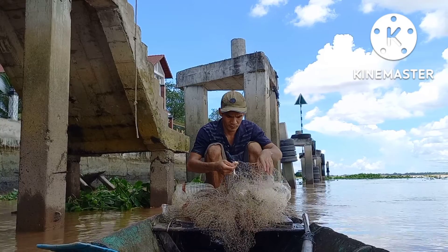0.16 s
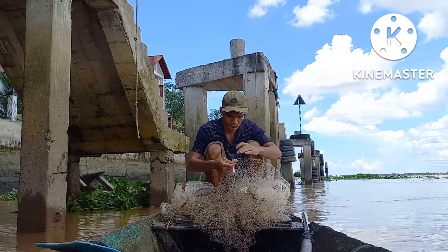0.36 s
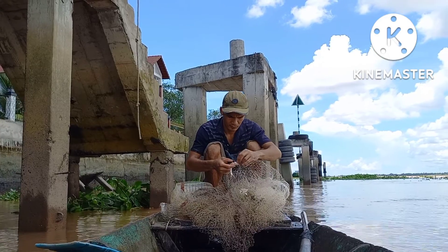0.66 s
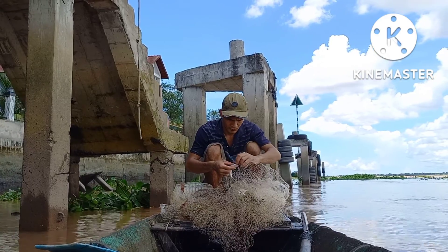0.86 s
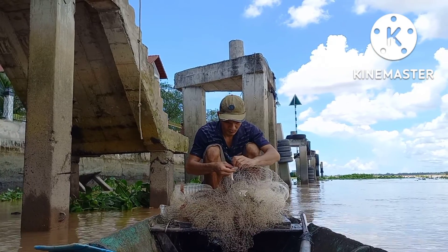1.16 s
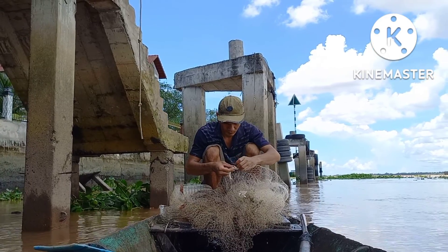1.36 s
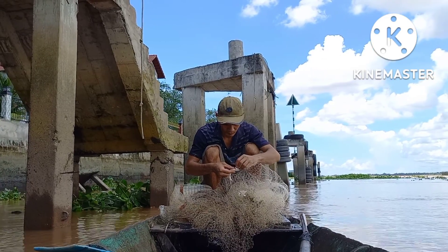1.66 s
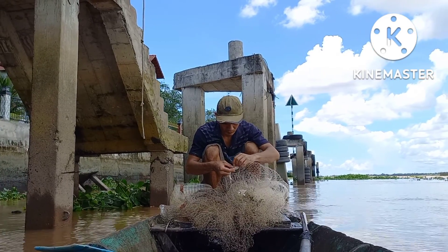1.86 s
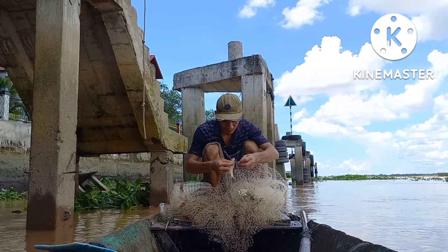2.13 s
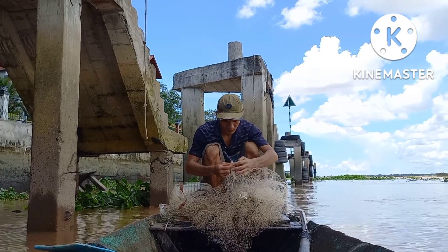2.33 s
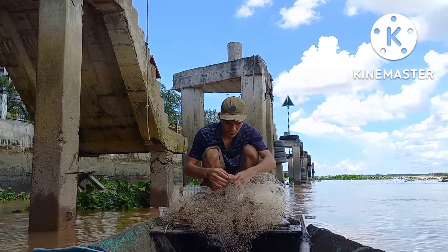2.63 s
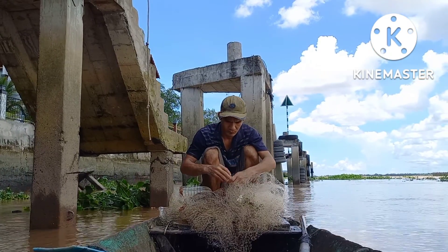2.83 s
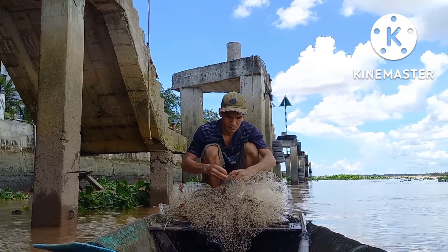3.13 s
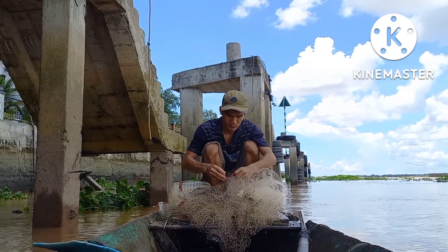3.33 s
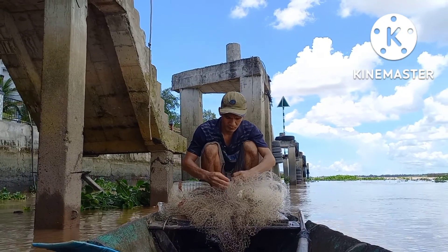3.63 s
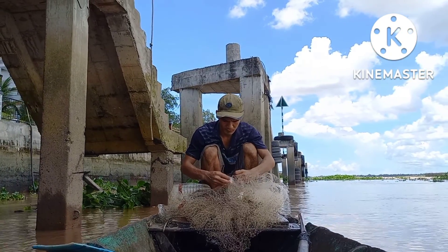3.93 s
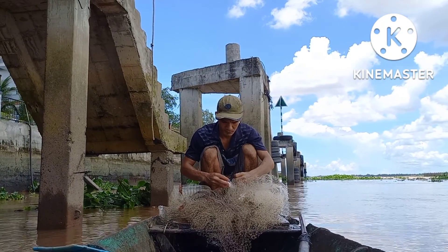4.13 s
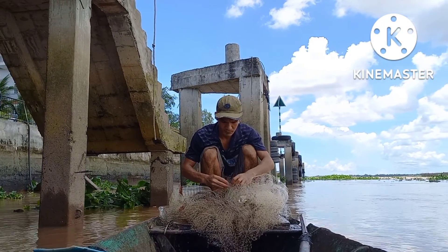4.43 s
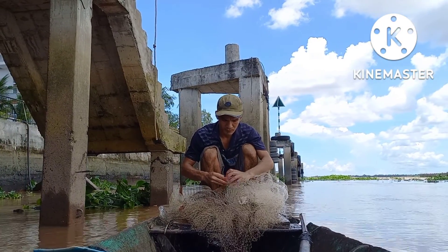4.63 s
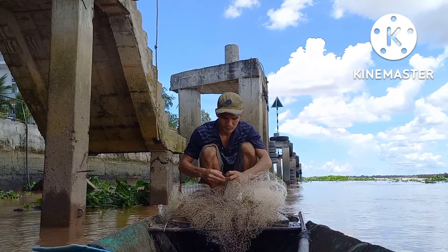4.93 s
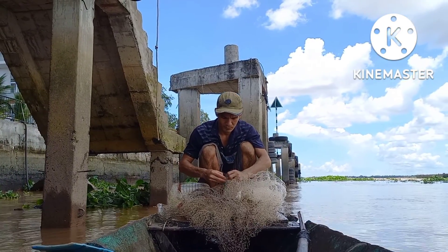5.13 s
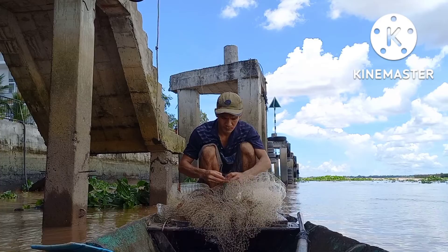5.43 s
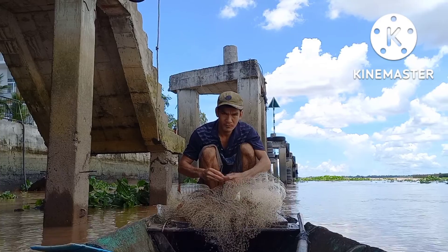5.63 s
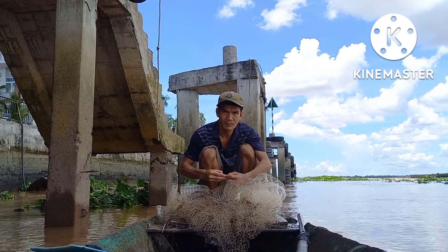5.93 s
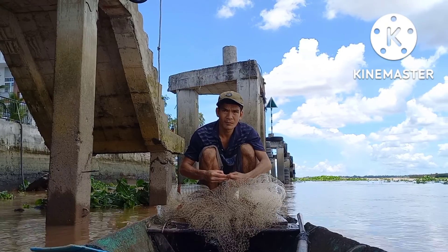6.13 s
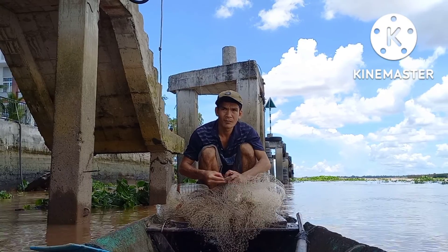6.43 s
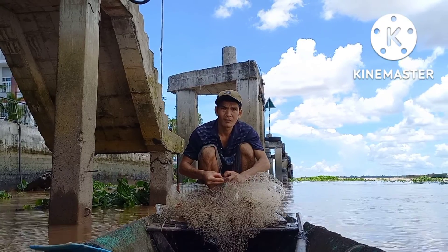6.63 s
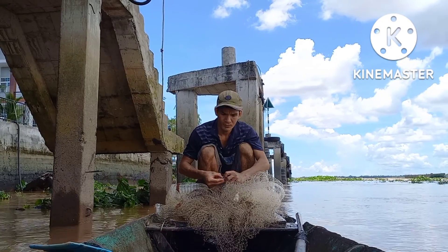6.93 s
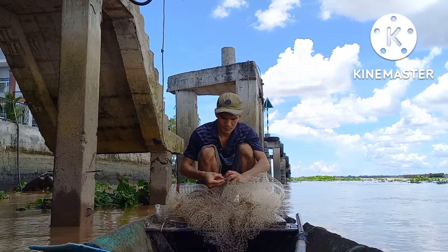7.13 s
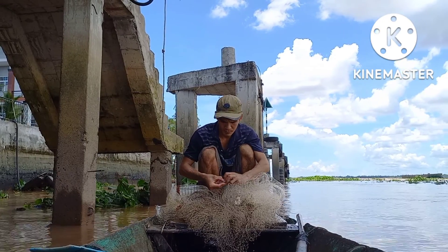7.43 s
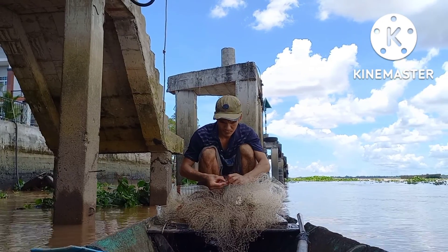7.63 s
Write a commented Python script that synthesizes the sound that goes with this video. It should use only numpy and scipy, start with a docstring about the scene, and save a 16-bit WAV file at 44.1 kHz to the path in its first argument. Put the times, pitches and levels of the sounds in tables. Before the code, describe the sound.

Outdoors on a river, heard close up in stereo from a small boat by a concrete pier. For the first 0.4 seconds thin metal rings jingle very high and bright, with a round water plop at the start. Drips follow at 0.45, 0.6 and 1.07 seconds. From 1.25 to 2.5 wet strands snap and spray amid plops and crackly rustle. Tiny ring pings come around 2.7 to 2.85, then a strong short plop at 2.98. Snaps are densest and sharpest from 3.4 to 4.15, with bright clinks near 3.65 and 4.15. Plops and spatters continue to 5, lighter ticks to 6.25, a drip at 6.5, then sparse drops at 7.15 and 7.7 with a last faint rustle. Throughout, a distant ship's low, wavering twin-diesel drone and rumble sits under soft lapping and hiss; from about 5.5 a small boat's rapid hollow chugging faintly grows.

```python
"""Wet net beside a pier

Heard from the bow of a small boat: a wet net is picked over close to the two microphone ports.
Drops plop as ringing bubbles, strands snap as noise bursts and metal rings jingle as struck modes.
Behind lie lapping and hiss of shaped noise, a distant ship whose two diesels are stacks of sines,
and a single-cylinder boat chugging nearer, its puffs ringing an exhaust pipe."""
import sys
import numpy as np
from scipy import signal
from scipy.io import wavfile
from scipy.ndimage import uniform_filter1d

SR = 44100
rng = np.random.default_rng(int(sys.argv[2]) if len(sys.argv) > 2 else 0)


def int16_out(signal):
    """Quantize to a 16-bit WAV file."""
    q = np.round(np.clip(np.atleast_2d(signal).T, -1, 1) * 32767)
    wavfile.write(sys.argv[1], SR, q.astype(np.int16))


N = 342657  # samples


def gain_of(db):
    """dB to gain."""
    return 10 ** (np.asarray(db) / 20)


def evened(x):
    """Scales to rms 1."""
    return x / np.sqrt(np.mean(x ** 2) + 1e-20)


def read(points, hz):
    """Reads a spectrum table on a log-frequency axis."""
    f, value = np.transpose(points)
    return np.interp(np.log(hz + 1), np.log(f + 1), value)


def curve(rows, t, column=1):
    """Reads one column of a curve at times t."""
    rows = np.asarray(rows)
    return np.interp(t, rows[:, 0], rows[:, column])


def add(mix, s, sound, pan_db, lag=4.4):
    """Places a sound: the louder port leads by lag samples per dB, or trails if lag is negative."""
    late = int(np.clip(lag * pan_db, -22, 22))
    for channel, sign in enumerate((1, -1)):
        start = round(s * SR) + max(-sign * late, 0)
        part = mix[channel, start:][:len(sound)]
        part += gain_of(sign * pan_db / 2) * sound[:len(part)]


def resonate(x, hz, width):
    """One resonance of gain 1 at its centre; width in Hz."""
    r = np.exp(-np.pi * width / SR)
    return 2 * signal.lfilter([1 - r], [1, -r * np.exp(2j * np.pi * hz / SR)], x).real


def drift(t, top_hz, count=20):
    """Slow chance of rms 1: sines of random phase, the slower ones stronger."""
    hz = np.geomspace(top_hz / 20, top_hz, count)[:, None]
    sines = np.sin(2 * np.pi * (hz * t + rng.random((count, 1))))
    return evened((sines / np.sqrt(hz)).sum(0))


# likeness of the two ports: (frequency [Hz], left-right correlation)
PORT_LIKENESS = [(30, .7), (60, 0.89), (130, 1), (290, 0.9), (640, 0.31), (1410, .2), (3100, 0.074),
                 (6820, -0.078), (15000, -0.087)]
# lean of the background noise: (frequency [Hz], left minus right [dB])
SIDE_LEAN = [(60, 1), (180, -1.5), (550, 3.5), (1650, 0.5), (4970, 1.0), (15000, 0.5)]


def noise(shape_db, size, patchy_db, same=None, lead=0):
    """Two-port noise of rms 1: shape_db(hz, t) shapes its bins, left leads by lead samples."""
    hop = size // 4
    frames = N // hop + 5
    hz = np.fft.rfftfreq(size, 1 / SR)[:, None]
    a, b, c, d, patches = rng.standard_normal((frames, len(hz), 5)).T
    patches = uniform_filter1d(patches, size=8, axis=0)
    patches = evened(uniform_filter1d(patches, size=10, axis=1))
    same = np.clip(read(PORT_LIKENESS, hz) if same is None else same, -1, 1)
    left = a + 1j * b
    delayed = left * np.exp(-2j * np.pi * hz * lead / SR)
    right = same * delayed + np.sqrt(1 - same ** 2) * (c + 1j * d)
    lean_db = read(SIDE_LEAN, hz) / 2
    level_db = shape_db(hz, np.arange(frames) * hop / SR) + patchy_db * patches
    bins = np.array([left, right]) * gain_of(level_db + np.array([lean_db, -lean_db]))
    return evened(signal.istft(bins, nperseg=size, noverlap=size - hop)[1][:, :N])


PORT_HZ, STARBOARD_HZ = 8.467, 8.19  # working cycles of the two diesels
WEAK_ORDERS_DB = -74
WAVER_DB, WAVER_TURNS, WAVER_TOP_HZ = 2.4, .1, 12  # rms waver of level and phase, and its fastest rate
# sounding orders of each diesel: (multiple of the cycle, level before swell and waver [dB rms])
PORT_ORDERS = [(6, -59.5), (12, -46), (14, -54), (15, -73), (17, -61.5), (18, -48.5), (19, -63.5),
               (20, -62), (21, -59.5), (22, -62), (24, -49), (27, -72), (28, -74.5), (30, -51), (33, -69.5),
               (34, -53.5), (35, -55), (36, -57.5), (37, -64.5), (48, -62), (51, -76), (59, -64), (63, -76)]
STARBOARD_ORDERS = [(7, -65.5), (8, -50.5), (10, -55.5), (12, -48), (14, -50), (16, -51), (17, -68),
                    (18, -49.5), (19, -50.5)]
# low tones apart from both engines' orders: (frequency [Hz], level before waver [dB rms])
OTHER_TONES = [(79.2, -52.5), (80.5, -48), (87.4, -47.5), (121, -57.5)]
# swell of the port diesel: (time [s], 12th order [dB], orders above it [dB])
PORT_SWELL = [(0, 0.5, 1), (2, -8, -1), (4.6, 0.5, -1.5), (5.2, 6, -2), (6.8, 5, -3), (7.3, 0.5, -7),
              (7.77, 8, -5)]


def ship():
    """Each diesel sounds multiples of its cycle; the air over the river makes every line waver."""
    t, slow = np.arange(N) / SR, np.arange(0, N / SR + .1, .02)
    out = np.zeros((2, N))
    weak = [(k, WEAK_ORDERS_DB) for k in range(38, 66) if k not in dict(PORT_ORDERS)]
    engines = ((PORT_HZ, list(PORT_ORDERS) + weak), (STARBOARD_HZ, STARBOARD_ORDERS), (1, OTHER_TONES))
    for hz, orders in engines:
        turns = hz * t + np.interp(t, slow, 0.0034 * drift(slow, 0.593))
        for k, db in orders:
            swells = k >= 12 and hz == PORT_HZ
            swell_db = curve(PORT_SWELL, slow, column=1 if k == 12 else 2) * swells
            level_db = db + swell_db + WAVER_DB * drift(slow, WAVER_TOP_HZ, count=12)
            level = np.interp(t, slow, np.sqrt(2) * gain_of(level_db))
            waver = np.interp(t, slow, WAVER_TURNS * drift(slow, WAVER_TOP_HZ, count=12))
            phase = 2 * np.pi * (k * turns + rng.random() + waver)
            # reflections off the pier differ between the ports
            skew = np.interp(t, slow, (.11 + .001 * k * hz) * drift(slow, 2.5, count=6))
            out += level * np.sin([phase + skew, phase - skew])
    return out


# colour of the exhaust roar: (frequency [Hz], relative level [dB])
ROAR_COLOUR = [(15, -56.5), (25, -38), (70, 1.5), (113, -1), (157, -0.5), (231, -10), (282, -6),
               (309, -13.5), (350, -16.5), (499, -17), (601, -23.5), (746, -23.5), (1000, -53.5),
               (1300, -79), (2200, -120)]
# course of the roar: (time [s], level [dB], lift from 200 Hz up, full from 400 Hz [dB])
ROAR_LEVEL = [(0, -41.5, 2), (2, -40.5, -0.5), (4, -43.5, 3.5), (5, -46, 5.5), (6, -40.5, -3),
              (7.77, -43, 1.5)]


def rumble():
    """Unsteady exhaust roar between the ship's lines: patchy low noise."""
    def shape(hz, t):
        upper = np.clip(np.log2((hz + 1) / 200), 0, 1)
        return read(ROAR_COLOUR, hz) + upper * curve(ROAR_LEVEL, t, column=2)
    return gain_of(curve(ROAR_LEVEL, np.arange(N) / SR)) * noise(shape, size=4096, patchy_db=2.5)


CHUG_PER_S, CHUG_AT_S = 12.64, 6.777  # firing rate, time of one firing
# boat drawing nearer: (time [s], level [dB])
CHUG_LEVEL = [(0, -74), (2, -74), (4, -72), (5.5, -67), (6.5, -60), (7.77, -59.5)]


def chug():
    """One exhaust puff a firing rings the pipe: a thump, then turbulence."""
    t = np.arange(N) / SR
    turns = (t - CHUG_AT_S) * CHUG_PER_S
    firing = np.floor(turns)
    strength = gain_of(2.0 * rng.standard_normal(120))[firing.astype(int) % 120]
    thump = 13 * (np.diff(firing, prepend=0) == 1)
    turbulence = np.exp(-(turns % 1) / .24) * rng.standard_normal((2, N))
    puffs = strength * (thump + turbulence)
    pipe = np.array([resonate(resonate(resonate(puff, 723, 82), 743, 200), 743, 200) for puff in puffs])
    lean_db = [[1.5], [-1.5]]  # a little to the left
    return gain_of(curve(CHUG_LEVEL, t) + lean_db) * evened(pipe)


HISS_DB, HISS_WAVER_DB = -74.5, .6
FAR_BUBBLES_DB = -26  # under the lapping
LEAD = 21  # samples between the two ports for sound from the side
# colour of the water, before the lapping and hiss are parted: (frequency [Hz], relative level [dB])
WATER_COLOUR = [(470, -17.5), (800, -0.5), (940, -9.5), (1150, -12), (1880, -22.5), (2600, -26.5),
                (4170, -31.5), (5830, -38), (6360, -35.5), (8570, -36), (14800, -37.5), (15600, -35)]
# course of the lapping: (time [s], level [dB])
LAPPING_LEVEL = [(0, -56.5), (0.6, -59.5), (0.8, -61.5), (1.14, -58), (1.44, -57.5), (1.83, -63),
                 (2.2, -57), (2.4, -60.5), (2.9, -59.5), (3.3, -63), (3.75, -61.5), (4.1, -61), (5.2, -60),
                 (5.41, -60), (5.75, -62), (6.08, -58), (6.32, -61.5), (7.24, -62), (7.74, -58)]


def river():
    """Lapping is low patchy noise with many tiny far bubbles; a steady hiss lies above it."""
    def lapping(hz, t):
        return read(WATER_COLOUR, hz) - 9 * np.log2(1 + (hz / 3000) ** 2) + 0 * t

    def hiss(hz, t):
        low_cut_db = 12 * np.log2(1 + (2800 / (hz + 1)) ** 2)
        return read(WATER_COLOUR, hz) - low_cut_db + HISS_WAVER_DB * drift(t, 28)

    low = noise(lapping, size=512, patchy_db=3.0, same=0.49, lead=LEAD)
    high = noise(hiss, size=512, patchy_db=1.2)
    far = np.zeros((2, N))
    for s, size, pitch, side in rng.random((500, 4)):
        bubble = plop(9 * size - 7 * pitch, 1000 * 2 ** (1.2 * pitch), 0.048, 0.033)
        add(far, s * N / SR, bubble, 10 * side - 3)
    lapped = low + gain_of(FAR_BUBBLES_DB) * evened(far)
    return gain_of(curve(LAPPING_LEVEL, np.arange(N) / SR)) * lapped + gain_of(HISS_DB) * high


PIER_DB = -14  # echoes under the near sound


def pier(x):
    """Short echoes off the hull and the concrete: sparse taps of random sign, dying fast."""
    at = np.arange(200, 6000, 20) + rng.integers(0, 20, (2, 290))  # samples
    echoes = rng.choice([-1., 1.], at.shape) * gain_of(-60 * at / SR / 0.17)  # t60 0.17 s
    taps = np.zeros((2, 6100))
    np.put_along_axis(taps, at, echoes, 1)
    return signal.oaconvolve(x, taps / np.linalg.norm(taps[0]), axes=1)[:, :N]


TUG_RISE_DB_PER_S = 607
# tugs at the mesh: (time [s], fade t60 [s], crackle level [dB], patter level [dB])
MESH_TUGS = [(1.264, 0.33, -77, -79), (1.56, 0.98, -78, -85), (1.69, 0.64, -78, -66),
             (1.804, 0.27, -65, -68), (2.321, 0.38, -84, -72), (2.929, .4, -81, -78),
             (3.08, 0.81, -79, -73.5), (3.401, 1, -73.5, -72.5), (3.592, 0.85, -66, -73),
             (3.769, 0.48, -69, -73), (3.943, .8, -73, -92), (4.087, 0.13, -73, -73),
             (4.147, 0.27, -73, -76), (4.587, 0.61, -79, -69), (4.893, 0.17, -80, -76),
             (4.951, 0.24, -89, -68), (5.27, 0.54, -69, -69.5), (5.48, 0.99, -78, -71.5),
             (6.083, .4, -85, -78), (6.197, 0.16, -74, -83), (6.252, .2, -84, -103),
             (7.722, 0.41, -72, -87)]


def rustle():
    """Knots slip in a dense crackle and droplets patter loose; each tug swells fast and fades."""
    out = np.zeros((2, N))
    t = np.arange(-.05, .3, 1 / SR)  # the tug peaks at 0
    for s, t60, crackle_db, patter_db in MESH_TUGS:
        chance = rng.random((3, 2, len(t)))
        size = gain_of(np.minimum(-4.2 * np.log(1 - chance[1]), 15))
        grains = (chance[0] < 2200 / SR) * size * np.sign(chance[2] - .5)
        crackle = evened(np.array([resonate(resonate(g, 11000, 9000), 11000, 12000) for g in grains]))
        # the patter takes its grains from the opposite port
        patter = evened(np.array([resonate(resonate(g, 1400, 1300), 1800, 1800) for g in grains[::-1]]))
        shape = gain_of(np.minimum(TUG_RISE_DB_PER_S * t, -60 * t / t60))
        shape = shape * signal.windows.tukey(len(t), .15)
        tug = shape * (gain_of(crackle_db) * crackle + gain_of(patter_db) * patter)
        part = out[:, round((s + t[0]) * SR):][:, :len(t)]
        part += tug[:, :part.shape[1]]
    return out


def splash(db, hz, t60):
    """About 1100 droplets a second, each a click ringing for a few cycles around one pitch."""
    t = np.arange(0, .25, 1 / SR)
    chance = rng.random((3, len(t)))
    size = gain_of(np.minimum(-4 * np.log(1 - chance[1]), 13))
    drops = (chance[0] < 1100 / SR) * size * np.sign(chance[2] - .5)
    width = .33 * hz
    spatter = evened(resonate(resonate(drops, hz, width), hz, width))
    return gain_of(db - 60 * t / t60) * np.minimum(t / 0.0069, 1) * spatter


# spatters of many small drops: (time [s], level [dB], centre [Hz], t60 [s], left minus right [dB])
SPATTERS = [(0.468, -68, 3800, .1, 0), (1.257, -64.5, 3300, 0.18, 1), (1.622, -72, 4300, 0.3, 3.5),
            (1.676, -76, 3520, 0.066, -1), (0.701, -65, 1940, 0.088, 5), (1.792, -61.5, 2590, 0.35, 4),
            (2.317, -59.5, 1900, .2, 4), (6.52, -64, 1300, .12, 1), (.712, -65, 1650, 0.073, -1),
            (3.048, -62, 1790, .1, 1), (4.581, -67, 1880, .25, 4), (.975, -65, 1610, 0.44, 2),
            (2.984, -65, 1500, .2, 2), (4.806, -71, 4730, 0.34, 2), (4.945, -78, 1850, .12, 5),
            (5.225, -79, 4050, 0.73, 11), (6.058, -62, 1500, 0.2, 1.5), (6.107, -69, 5200, .05, 0),
            (6.121, -71, 4100, 0.13, 4.5), (6.195, -70, 3200, 0.17, -0.5), (6.2, -70, 4400, .06, -1)]


def splashes(out):
    """Many small drops hit the water at once."""
    for s, db, hz, t60, pan_db in SPATTERS:
        add(out, s, splash(db, hz, t60), pan_db)


def rings(taps, hz, spread):
    """Taps through the modes of a metal ring; spread scales the mode widths."""
    total = 0
    for multiple, db, width in RING_MODES:
        mode = resonate(taps, hz * multiple, width * spread)
        total = total + gain_of(db) * resonate(mode, hz * multiple, width * spread)
    return total


# modes of one ring: (multiple of its pitch, level [dB], width before spread [Hz])
RING_MODES = [(1, 0, 300), (1.028, -6, 250), (1.11, -17, 500), (.555, -17, 260), (.46, -18, 300),
              (.185, -21, 300)]
RING_HZ = 13400
# rings shaken together: (time [s], level [dB])
JINGLE_LEVEL = [(0.0, -58), (0.034, -65), (0.044, -62.5), (0.186, -57), (0.216, -60), (0.272, -57.5),
                (0.294, -66), (0.3, -60.5), (0.34, -66.5), (0.4, -90)]


def jingle(out):
    """Four rings of a bunch, each tapped at random and rattling unevenly, open the scene."""
    t = np.arange(0, JINGLE_LEVEL[-1][0], 1 / SR)
    for pan_db, size in ((-10, .972), (10, .99), (-10, 1.012), (10, 1.035)):
        hits = rng.random(len(t)) < 3000 / SR
        taps = hits * gain_of(1.8 * rng.exponential(1, len(t))) * rng.choice([-1, 1], len(t))
        taps *= gain_of(5 * drift(t, 150))
        chime = rings(taps, RING_HZ * size, spread=1.4)
        clatter = resonate(resonate(rng.permutation(taps), 13000, 7900), 12500, 7700)
        shaken = evened(chime) + gain_of(-10.0) * evened(clatter)
        add(out, 0, gain_of(curve(JINGLE_LEVEL, t)) * shaken / np.sqrt(2), pan_db)


PING_S = 0.041  # time to fall 60 dB
# small metal rings touching: (time [s], level [dB], ring pitch [Hz], left minus right [dB])
RING_PINGS = [(2.699, -62, 13850, 11), (2.7204, -65, 13400, -2), (2.7556, -68, 13100, -15),
              (2.8035, -71, 14000, -3), (2.8285, -73, 13800, 0), (2.8434, -70, 14200, 3),
              (3.6237, -59, 13700, -1), (3.6512, -53, 13540, -4.5), (4.1255, -58, 13160, -1),
              (4.153, -62, 13060, -3), (4.2088, -63, 13900, 0), (5.7857, -66, 14000, 7.5),
              (6.5021, -68, 13300, -7)]


def pings(out):
    """Rings touch: noise through the ring modes, dying fast."""
    t = np.arange(0, .15, 1 / SR)
    for s, db, hz, pan_db in RING_PINGS:
        chatter = evened(rings(rng.standard_normal(len(t)), hz, spread=.6))
        add(out, s, gain_of(db - 60 * (t / PING_S) ** 1.6) * chatter, pan_db)


SPRAY_T60_S = 0.12


def snap(db, tilt_db, centre_hz):
    """A sharp bright tick, then a grainy spray of fine droplets."""
    t = np.arange(0, .16, 1 / SR)
    clumps_db = 10 * uniform_filter1d(rng.standard_normal(len(t)), size=40)
    grains = rng.standard_normal(len(t)) * gain_of(clumps_db)
    tick = grains * gain_of(-60 * t / 0.01)
    spray = grains * gain_of(-8.5 - 60 * t / SPRAY_T60_S)
    low = resonate(.3 * tick + spray, centre_hz, .45 * centre_hz)
    low = resonate(low, centre_hz, .6 * centre_hz)
    high = resonate(.9 * tick + spray, 11400, 6000)
    high = 1.15 * resonate(resonate(high, 12000, 6500), 12000, 6500)
    share = np.clip(gain_of(tilt_db), .05, .98)
    return gain_of(db) * (np.sqrt(1 - share ** 2) * low + share * high)


# strands flicking and spraying: (time [s], level [dB], share of high treble before limits [dB],
# centre of the low treble [Hz], left minus right [dB])
STRAND_SNAPS = [(0.471, -59, -12, 4800, 5), (0.5255, -65, 0, 6500, 3), (1.258, -64, -15, 4500, 3),
                (1.5604, -59, -15, 7800, 8), (1.5674, -57, -19, 7000, 5), (1.622, -54, -16, 6300, 3.5),
                (1.677, -56, -19, 4200, 5), (1.768, -63, 0, 6900, 3), (1.7944, -50, 7, 8140, 4),
                (1.8394, -61, -11, 8040, -1), (2.0956, -64, -11, 7800, 0), (2.3196, -58, -22, 6500, 6.5),
                (2.4516, -59.5, -22, 5200, 9), (2.93, -61, -13, 7700, 4), (2.947, -59, -22, 8000, -1),
                (3.4024, -52.5, -19, 6800, 3), (3.4344, -61, -15, 6900, 2), (3.4554, -59, -14, 7500, 3),
                (3.5927, -50, 2, 7900, 3), (3.625, -50, 0, 6200, 0.5), (3.7585, -58, -8, 8000, 5),
                (3.7894, -67, 1, 6500, 4), (3.904, -57.5, -6, 7700, 3.5), (3.925, -54, -4, 7200, 2.5),
                (3.947, -48, -6.5, 7550, 4.5), (3.993, -55.5, 1, 8200, 8), (4.077, -59.5, -11, 6800, 5),
                (4.148, -52.5, -6, 8000, 4), (4.579, -61, -16, 5900, 5), (4.6094, -59, -20, 6200, 5),
                (4.807, -53.5, -14, 6430, 5), (5.224, -63, -7, 6100, 5), (5.25, -65, 1, 6500, 9),
                (5.2894, -63, -11, 6500, -8), (5.3258, -62, -2, 6500, 3.5), (5.4794, -61, -19, 6500, 7),
                (5.5608, -61.5, -10, 8000, 4), (5.9614, -62, -6, 7100, 4), (6.0856, -59, -20, 6500, 3),
                (6.1215, -63, -16, 5900, 2), (6.1957, -57, -19, 6500, 4), (6.252, -51.5, 6, 9300, 5),
                (6.501, -57.5, -10, 7500, 3)]


def snaps(out):
    """Wet strands flick close to the ports."""
    for s, db, tilt_db, hz, pan_db in STRAND_SNAPS:
        add(out, s, snap(db, tilt_db, hz), pan_db)


CLUSTER_HZ, CLUSTER_BLUR, CLUSTER_CYCLES = 1300, .55, 6  # shattering drops: pitch, most blur, beat length
# a strong new bubble starts sharp by up to this share and settles within these cycles
SETTLE, SETTLE_CYCLES, SETTLE_FROM_DB = .11, 4, -55


def plop(db, hz, t60, climb):
    """A big drop's bubble settles, rings and glides in pitch; a small one is a blurred cluster."""
    t = np.arange(0, t60, 1 / SR)
    strength = np.clip((db - SETTLE_FROM_DB) / 14, .15, 1)
    sharp = SETTLE * strength * min(CLUSTER_HZ / hz, 1) * np.exp(-t * hz / SETTLE_CYCLES)
    glide = climb * (t / (.25 * t60)) ** 1.6
    pitch = hz * np.clip(1 + glide + sharp, .8, 1.6)
    turn = np.exp(2j * np.pi * np.cumsum(pitch) / SR)
    rough = np.clip(.25 + .4 * np.log2(hz / CLUSTER_HZ), .1, CLUSTER_BLUR)
    span = round(CLUSTER_CYCLES * SR / hz)
    blur = rng.standard_normal((2, SR // 4))[:, :len(t)]
    a, b = uniform_filter1d(uniform_filter1d(blur, size=span), size=span)
    beats = (a + 1j * b) / np.sqrt(np.mean(a ** 2 + b ** 2))
    ringing = (turn * (np.sqrt(1 - rough ** 2) + rough * beats)).imag
    swell = 1 - np.exp(-t * hz / 1.4)
    return gain_of(db - 60 * (t / t60) ** 1.47) * swell * ringing


# bubbles left by drops: (time [s], level [dB], pitch [Hz], t60 [s],
# share by which the pitch climbs or sags in a quarter of t60 [1], left minus right [dB])
DROP_BUBBLES = [(0.002, -43.5, 1012, 0.076, 0.11, 4.5), (0.185, -73, 1800, 0.11, 0.88, -1),
                (0.188, -54, 1266, 0.077, 0.074, 5), (0.269, -60, 1740, 0.027, 0.012, -4),
                (0.384, -56.5, 1260, .035, 0.078, -9), (0.392, -63, 1740, .05, 0, -1),
                (0.405, -60, 1080, .06, 0, -2), (0.448, -48, 1260, 0.058, 0.057, -5),
                (0.449, -62, 1730, .035, 0.036, -1.5), (0.474, -56.5, 3420, 0.037, -0.039, -4),
                (.493, -68, 3800, 0.022, .03, 3), (0.48, -59, 1670, 0.067, 0.06, -1.5),
                (0.597, -44.5, 1110, 0.057, 0.055, 4), (0.7, -56, 1810, 0.043, .03, 4),
                (0.713, -65, 2000, 0.084, 0.017, 4), (0.978, -58, 1350, 0.059, 0.02, 2),
                (1.05, -56, 1580, 0.03, 0.065, -3), (1.066, -58, 1490, .03, 0, 1),
                (1.071, -48, 994, 0.081, 0.045, 4), (1.095, -66.5, 1814, 0.1, -0.068, -3),
                (1.189, -56, 1940, 0.053, 0.039, 3), (1.224, -63.5, 1765, 0.11, 0.049, -6),
                (1.258, -64, 1800, .033, -0.1, 3.5), (1.259, -64, 2960, .018, 0, 2),
                (1.265, -66, 2760, .018, 0, -2), (1.272, -68, 2900, .035, 0.01, -2),
                (1.309, -74, 2850, .05, 0.01, 3), (1.332, -72, 2880, .03, 0, 2),
                (1.423, -55, 1170, 0.025, 0.051, 0), (1.45, -53, 1040, 0.036, -0.0048, 1),
                (1.564, -65, 2530, .052, 0.0098, 3.5), (1.622, -60, 4300, .025, 0.053, 2.5),
                (1.632, -62, 4300, .03, 0, 2.5), (1.631, -60, 1530, 0.052, 0.042, 1),
                (1.673, -49.5, 872, 0.11, 0.05, 5), (1.677, -50, 2250, 0.057, 0, -3),
                (1.688, -53, 1240, 0.086, 0.026, -2), (1.693, -67, 1740, 0.08, 0.026, -1),
                (1.794, -68, 1720, 0.1, 0.041, 1), (1.793, -53, 2500, 0.026, 0.096, -5.5),
                (1.794, -68.5, 4300, 0.046, 0, 3), (1.798, -61, 3160, 0.044, 0.059, 0),
                (1.809, -56, 2800, 0.044, 0.023, 4), (1.822, -64, 2720, 0.032, 0.16, 2),
                (1.836, -67, 2420, .06, -0.033, 2), (1.856, -71, 2790, .04, 0.091, -1),
                (2.098, -59, 1840, 0.057, 0.076, 4.5), (2.29, -43, 958, 0.043, 0.047, 2),
                (2.306, -46.5, 948, 0.082, .06, 2), (2.318, -57, 1570, 0.023, 0.079, 6),
                (2.319, -60, 2000, 0.033, 0.048, 6), (2.328, -70, 2300, 0.035, 0, 1),
                (2.348, -59, 1920, 0.023, 0, 5), (2.45, -52.5, 906, 0.046, 0.014, -1),
                (2.947, -72.5, 3860, 0.11, 0.0061, 3), (2.982, -34, 953, 0.017, -0.019, 3.5),
                (2.997, -60, 1530, 0.03, -0.12, -1.5), (3.012, -66, 1480, .05, -0.097, 0),
                (2.993, -50, 900, 0.033, 0.1, 1), (3.008, -47, 960, 0.05, 0.04, 2),
                (3.026, -54, 1080, 0.05, 0.16, 1), (3.04, -55, 1506, 0.032, 0.15, 1),
                (3.053, -62, 1710, .03, .05, 3), (3.099, -65, 1830, 0.043, 0.046, 5),
                (3.578, -45, 715, 0.15, 0.081, 0), (3.593, -66, 1840, 0.045, 0.038, 0.5),
                (3.702, -58.5, 1640, 0.047, -0.018, 5), (4.079, -57, 1740, 0.04, 0.084, 2),
                (4.081, -65, 1890, 0.026, 0.063, 5), (4.3, -48.5, 892, 0.085, 0.011, 4.5),
                (4.376, -45.5, 973, 0.029, 0, 3), (4.58, -55, 1830, 0.027, 0.07, 3),
                (4.583, -65, 2180, .03, 0.06, 3.5), (4.595, -60, 1800, 0.034, 0, 5),
                (4.623, -50.5, 1830, 0.029, -0.026, 4), (4.632, -60, 1740, .03, 0, 3),
                (4.651, -63, 1830, .03, 0, 3.5), (4.807, -71, 4500, .03, -0.11, 1),
                (4.713, -63, 3560, 0.026, -.008, -2), (4.826, -46.5, 1172, 0.089, 0.013, 4),
                (4.886, -57, 1580, 0.044, 0.018, 6), (4.884, -63, 1900, .03, -0.12, 0.5),
                (4.901, -47.5, 899, 0.15, -0.0089, 6), (4.906, -59, 1490, 0.029, 0.02, 3),
                (4.947, -60, 1540, .045, -0.068, 4), (4.968, -69, 1740, .03, 0, 3),
                (4.978, -65, 1450, .04, 0, 4), (5.043, -68, 3620, 0.049, -.04, 2),
                (5.29, -61, 1310, 0.054, 0.07, 3), (5.477, -71, 2000, 0.031, 0, 5),
                (5.492, -63, 1860, 0.045, 0, 6), (5.512, -79, 2500, .03, 0.08, 2),
                (5.546, -66, 1980, 0.036, 0, -1.5), (5.964, -63, 2200, 0.047, 0.063, 4),
                (6.057, -60, 1460, .03, 0.056, 0), (6.068, -58, 1340, 0.077, 0.01, 3),
                (6.084, -58, 1400, .05, .02, 2), (6.067, -66, 2000, 0.061, 0.048, -3),
                (6.114, -50.5, 1097, 0.053, 0.035, -5), (6.121, -68, 4050, .03, 0, 3.5),
                (6.195, -62, 2580, 0.028, 0.04, -6), (6.202, -70, 2400, .04, 0, -4),
                (6.202, -69, 5200, .025, 0, 0), (6.216, -70, 2550, .03, 0, -4),
                (6.52, -43, 970, 0.05, 0.02, 0.5), (6.684, -59, 1460, 0.05, 0.004, 4),
                (7.148, -48.5, 895, 0.14, 0.015, 3.5), (7.709, -58, 1175, 0.064, 0, 1.5)]


def plops(out):
    """Single drops fall in the water beside the boat, each leaving a bubble."""
    for s, db, hz, t60, climb, pan_db in DROP_BUBBLES:
        add(out, s, plop(db, hz, t60, climb), pan_db, lag=-1.0)


def net():
    """The net in hand: splashes, the opening jingle, pings, snaps and plops."""
    out = np.zeros((2, N))
    for layer in (splashes, jingle, pings, snaps, plops):
        layer(out)
    return out


def scene():
    """Everything heard from the bow."""
    near = net() + rustle()
    return near + gain_of(PIER_DB) * pier(near) + ship() + rumble() + chug() + river()


EDGE_HZ = 15580  # upper band limit


def record(dry):
    """The microphone opens over 2 ms and drops the deepest bass; then the band limit."""
    opened = dry * np.minimum(np.arange(N) / 90, 1)
    cut = signal.sosfilt(signal.butter(2, 48, "high", fs=SR, output="sos"), opened)
    band = signal.firwin(1023, EDGE_HZ, window=("kaiser", 9), fs=SR)
    return signal.oaconvolve(cut, band[None], "same", axes=1)


dry = scene()
out = record(dry)
int16_out(out)
```